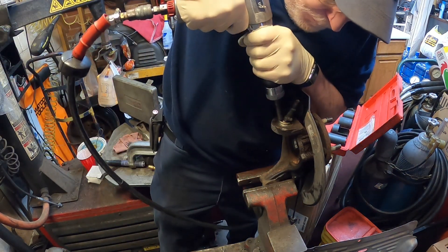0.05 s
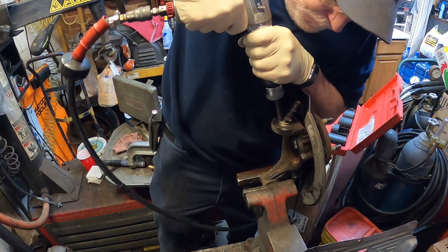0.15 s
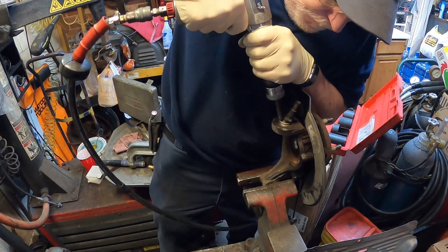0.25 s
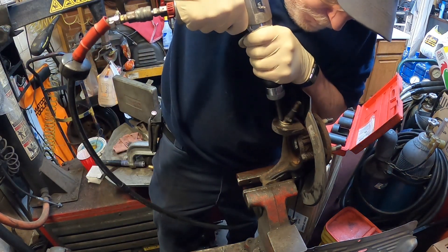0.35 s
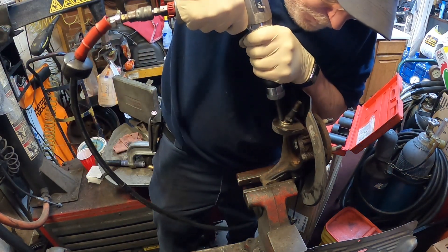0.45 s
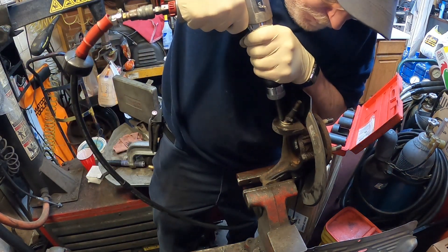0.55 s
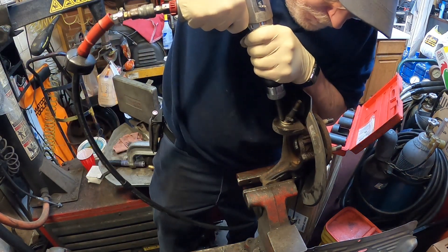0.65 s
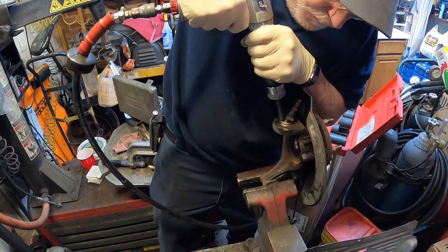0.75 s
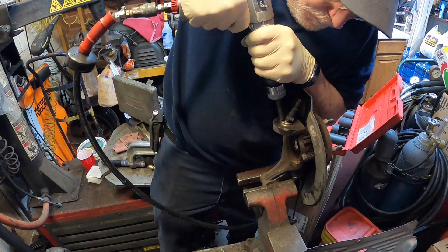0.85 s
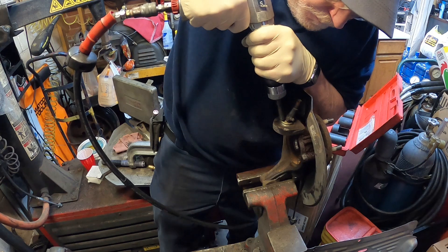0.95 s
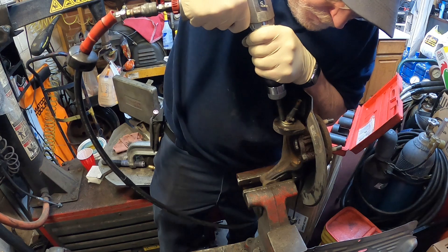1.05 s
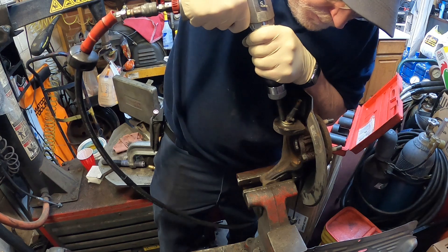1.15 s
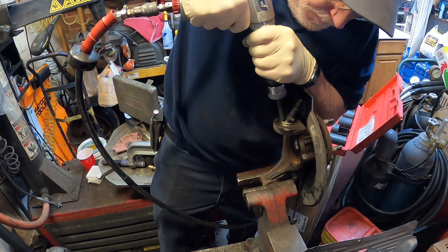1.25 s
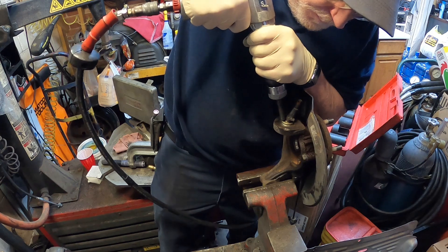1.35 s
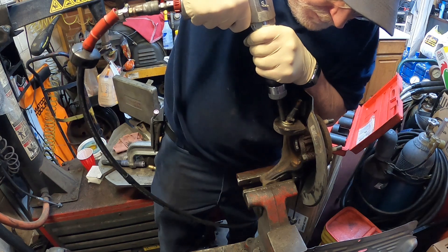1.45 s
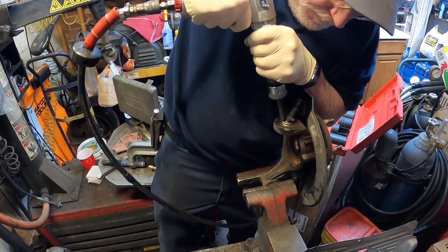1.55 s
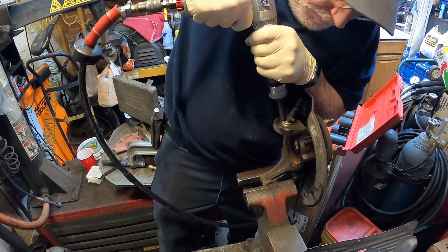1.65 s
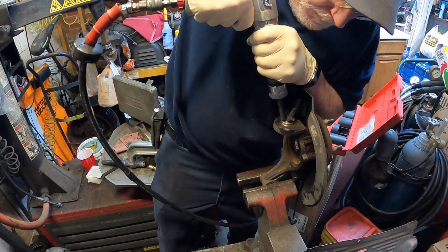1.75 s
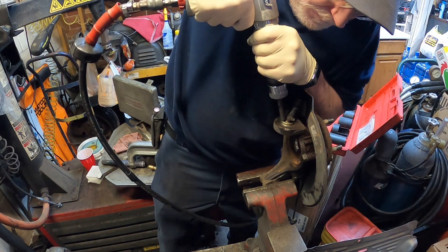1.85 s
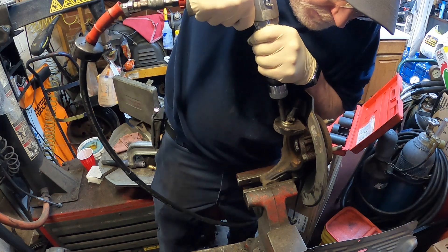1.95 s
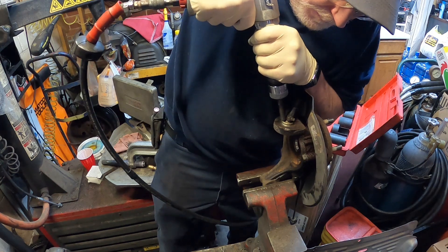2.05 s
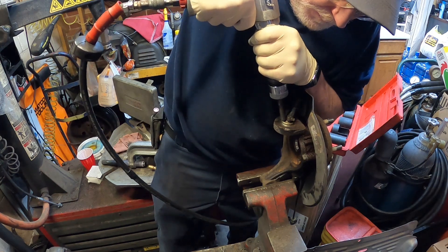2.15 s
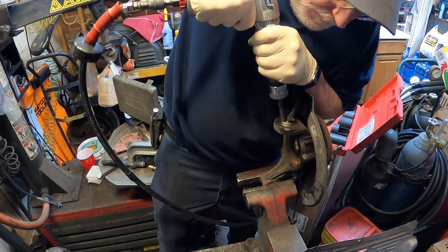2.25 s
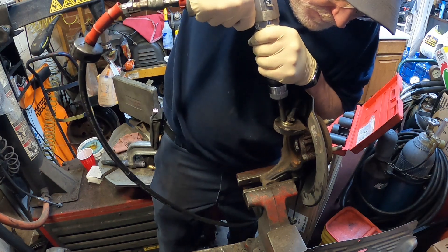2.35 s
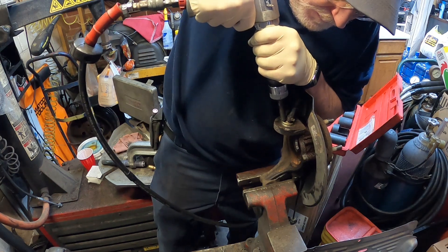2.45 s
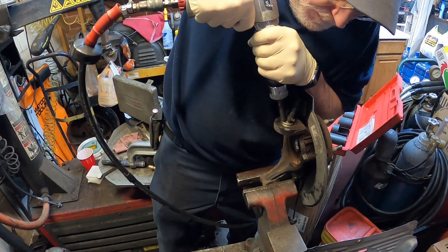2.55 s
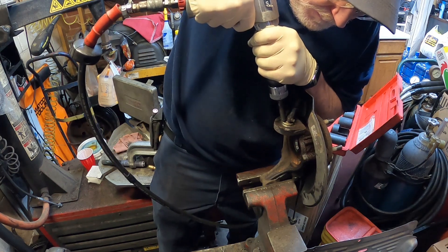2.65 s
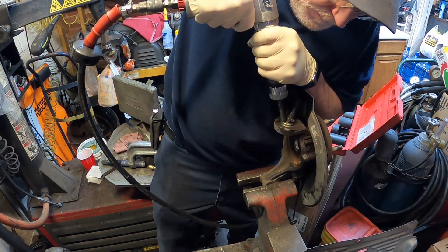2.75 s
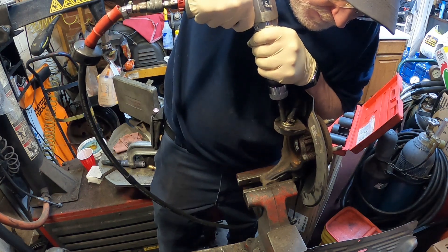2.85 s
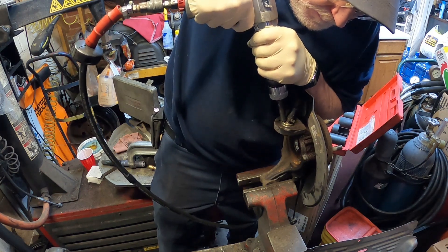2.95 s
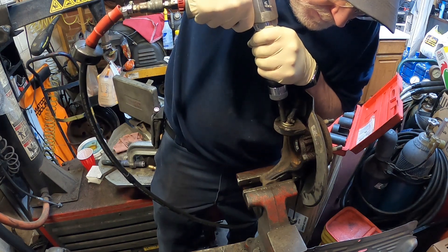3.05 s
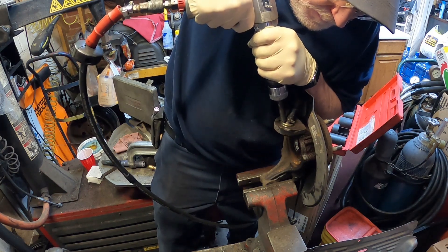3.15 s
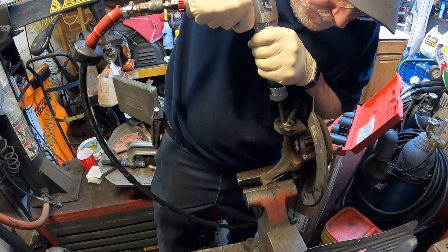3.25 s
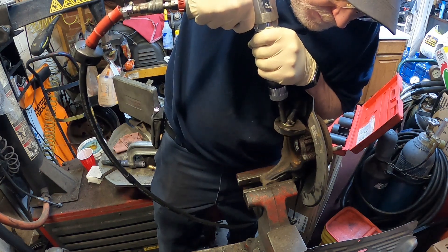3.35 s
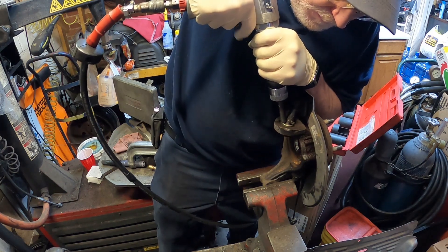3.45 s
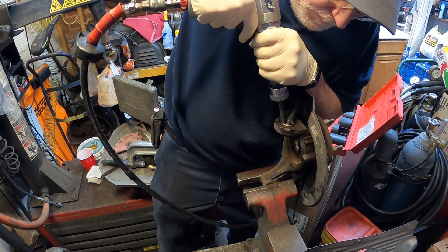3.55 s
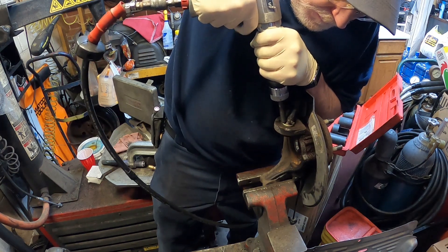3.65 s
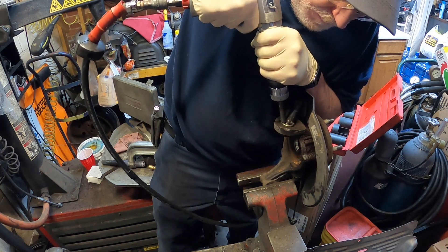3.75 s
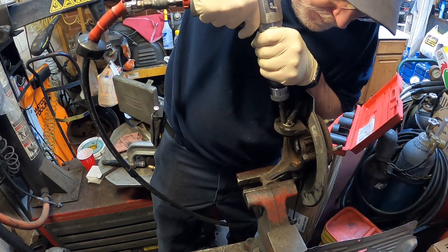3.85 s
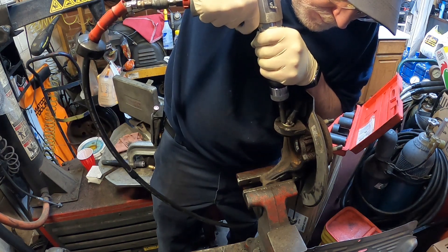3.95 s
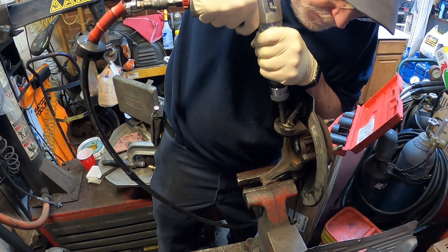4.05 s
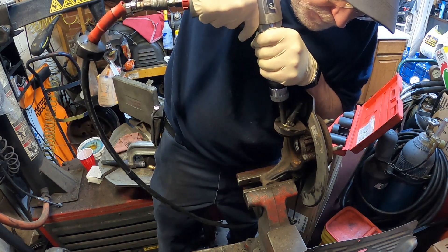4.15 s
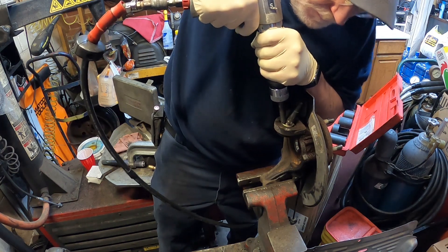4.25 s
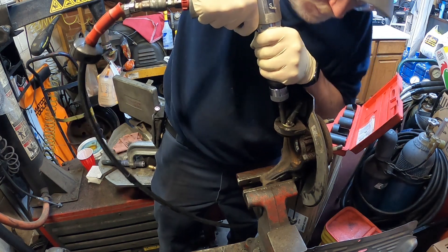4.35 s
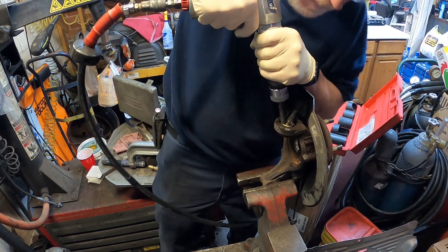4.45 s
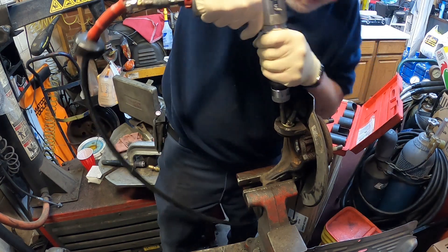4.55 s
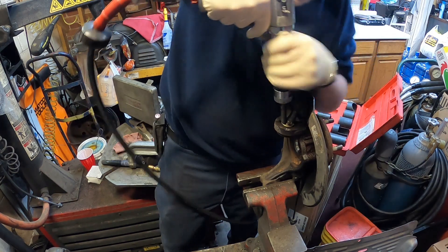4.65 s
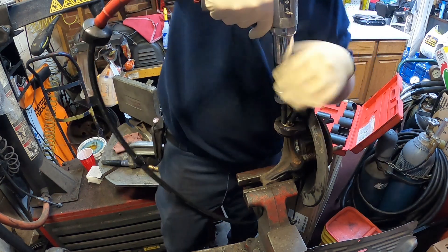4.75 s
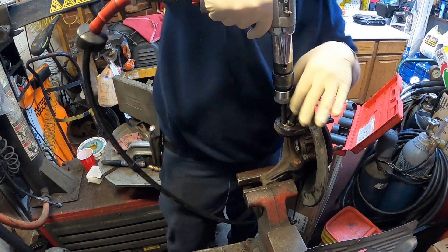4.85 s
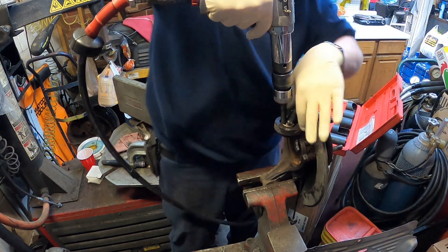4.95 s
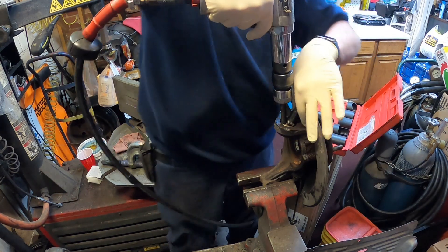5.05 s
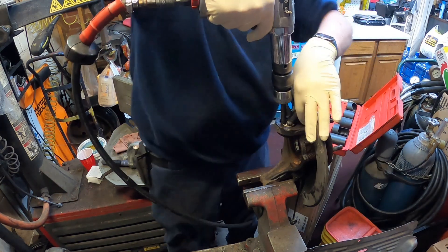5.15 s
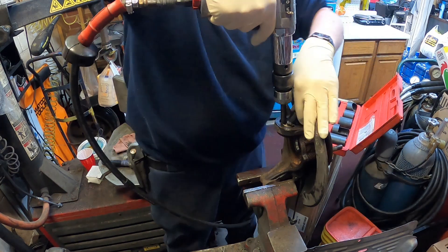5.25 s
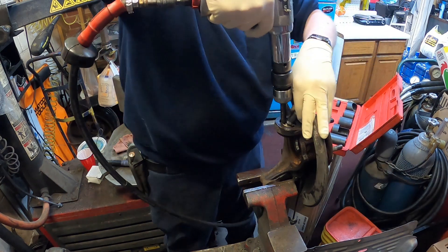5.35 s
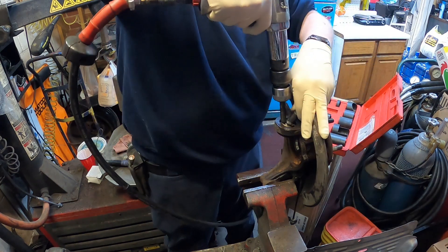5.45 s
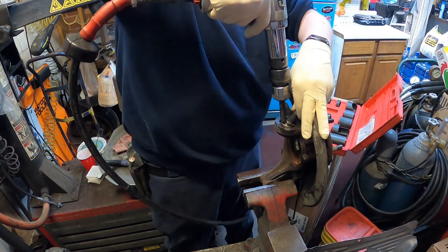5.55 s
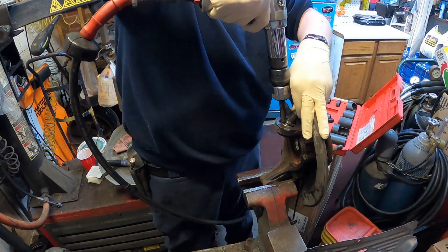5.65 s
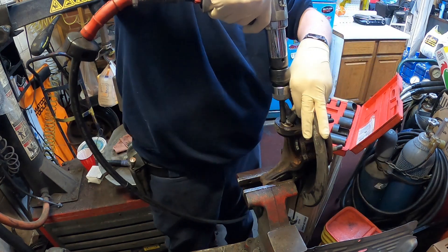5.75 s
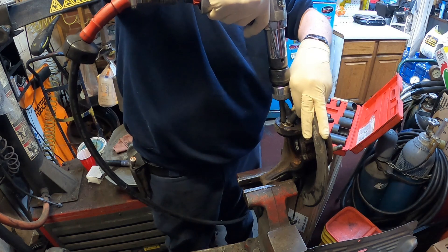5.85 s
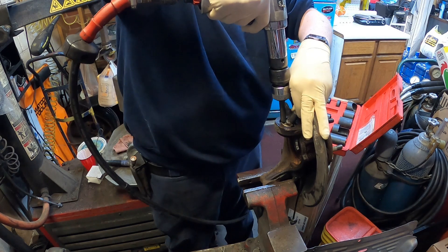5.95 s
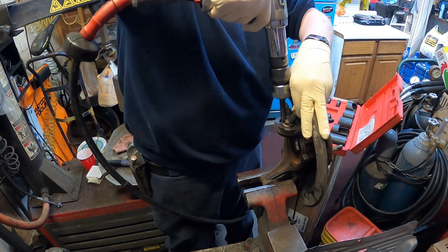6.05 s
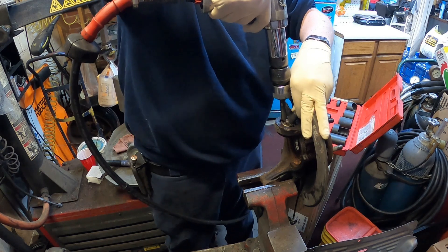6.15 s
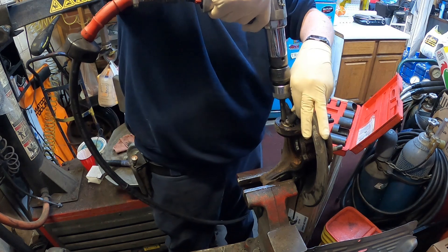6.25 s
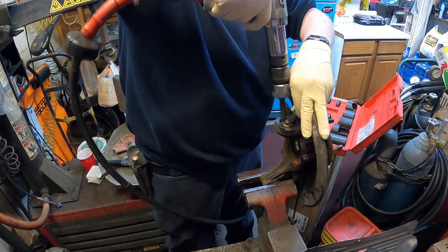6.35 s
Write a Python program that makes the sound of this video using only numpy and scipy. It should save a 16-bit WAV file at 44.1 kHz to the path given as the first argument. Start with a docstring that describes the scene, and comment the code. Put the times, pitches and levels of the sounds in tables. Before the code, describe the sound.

From the very start an air hammer close to the microphone drives a chisel against a steel part in a vise, in a small cluttered garage with short, dull reverberation. Until 3.5 seconds it is one dense metallic rattle, about forty blows a second, easing to thirty-seven; the clank changes colour as the chisel seats, over puffing, hissing exhaust and a low bench drone. Two weakening late blows follow. Short bursts of about four strokes come at 3.8, 4.1 and 4.4, led by soft air puffs and trailed by late clanks. The steel rings away from 4.6; a light tick at 4.8, a faint rub around 5, a fainter tick at 5.2 and a low rumble near 5.5 mark the tool being shifted. Another burst hits at 5.76 with one late blow, then a longer one from 6.05 until the end, with heavier bench thumps. Quiet room hush and a faint air leak lie underneath.

```python
"""Air hammer on clamped steel

An air hammer drives a chisel against a steel part held in a vise, in a small garage: one long burst, then five short ones.
Each piston stroke puffs air twice and strikes once, as clicks and noise bursts that excite resonances and filters.
The steel clanks and rings on, and as the air runs out the last blows come late.
In the pause the tool is shifted, with two ticks, a rub and a low rumble, all of shaped noise and ringing modes."""
import sys
import numpy as np
from scipy import signal
from scipy.fft import rfft, irfft
from scipy.io import wavfile
from scipy.ndimage import uniform_filter1d

SR = 44100
rng = np.random.default_rng(int(sys.argv[2]) if len(sys.argv) > 2 else 0)


def store_wav(level_fs):
    """Save 16-bit WAV to argv[1]."""
    pcm = np.round(np.clip(np.atleast_2d(level_fs), -1, 1) * 32767)
    wavfile.write(sys.argv[1], SR, pcm.T.astype(np.int16))


N = 281799
TIME = np.arange(N) / SR  # seconds

# Colour of the clank as the hammer starts. Each row: frequency in Hz, relative level in dB.
CLANK_FIRST = [(450, -16.5), (760, -17), (1110, -9), (1620, -16), (1840, -7), (2250, -6.5), (2460, 2.5),
               (2750, -6), (3040, -13.5), (3410, -12.5), (4730, -9), (8680, -43.5), (10900, -39),
               (12500, -36.5), (15500, -66)]
# Colour once the chisel has seated itself. Each row: frequency in Hz, relative level in dB.
CLANK_SEATED = [(450, -38), (760, -27), (907, -4), (1460, -17.5), (1600, -21), (2430, -3), (2790, -7),
                (3040, -3.5), (3330, -14), (5790, -11.5), (6330, -18.5), (8570, -16.5), (10900, -28.5),
                (12700, -28), (15500, -38)]
# Colour in the short bursts before the tool is shifted. Each row: frequency in Hz, relative level in dB.
CLANK_BURSTS = [(590, -25.5), (1000, -2), (1190, -19), (1440, -18.5), (1580, -17), (2450, -1.5),
                (2650, -6.5), (3040, -1), (3300, -17.5), (3910, -4), (4240, -11), (8060, -10.5),
                (11500, -26), (12800, -28.5), (15500, -36)]
# Colour after the tool is shifted. Each row: frequency in Hz, relative level in dB.
CLANK_SHIFTED = [(380, -58), (650, -27), (918, -3.5), (1330, -13.5), (1480, -7.5), (1580, -16.5),
                 (2060, 0.5), (2450, 2), (2720, -11), (2950, 2), (3410, -16), (3950, -6.5), (6200, -17),
                 (7880, -18.5), (15500, -50)]
# Damped resonances of chisel and tool. Each row: frequency in Hz, width in Hz, relative level in dB.
CHISEL_MODES = [(1430, 44, -8), (2483, 53, 6.5), (3140, 130, 0.5), (3490, 43, -6), (3870, 16, -2.5),
                (3950, 45, -9.5), (4790, 36, -13), (5215, 61, -13), (5534, 51, -10.5), (5870, 22, -8),
                (6080, 17, -13), (6600, 84, -35), (8026, 47, -15.5), (7770, 210, -23.5), (9350, 270, -20.5)]
# The part rings less under the pressed chisel, and under the hand laid on it after the pause
PRESSED_DB, HELD_DB = -3.5, -2.5


def steel(times, strike_db, crack_db, running):
    """A short dense clank and a bright crack, with the chisel's resonances and the long ring of the part."""
    blows = contacts(times, strike_db, running, chatter_db=-3.5, chatter_s=.008, return_db=-8.0)
    knocks = contacts(times + .001, strike_db, running, chatter_db=-16.0, chatter_s=.004, return_db=-2.5)
    cracks = spray(clicks(times - .0015, crack_db), 0.016)

    # share of each seat of the chisel over time
    seated = np.interp(TIME, [.15, .7], [0, 1])
    bursts, shifted = TIME > 3.7, TIME > 5
    seats = [
        (CLANK_FIRST, 1 - seated),
        (CLANK_SEATED, seated * ~bursts),
        (CLANK_BURSTS, bursts & ~shifted),
        (CLANK_SHIFTED, shifted),
    ]
    clank = np.zeros(N)
    for spectrum, share in seats:
        body = unit(cut(colour(dense_modes(t60=0.044), spectrum), 4990, "low"))
        edge = unit(cut(colour(dense_modes(t60=0.0067), spectrum), 5840, "high"))
        clank += from_db(16.0) * through(blows * share ** .5, body)
        clank += from_db(30.0) * through(cracks * share ** .5, edge)

    chisel = np.zeros(N)
    for k, (hz, width_hz, db) in enumerate(CHISEL_MODES):
        t60 = np.log(1000) / (np.pi * width_hz)  # a wide resonance dies sooner
        sign = (-1) ** k
        chisel += sign * from_db(db) * np.sqrt(width_hz / 80) * ring(knocks, hz, t60)
    chisel *= from_db(np.where(shifted, -16.0, -10.0))

    pressed_db = PRESSED_DB * (times < LAST_STROKE_S)
    held_db = HELD_DB * np.interp(times, TIME, shifted)
    long_ring = part_ring(clicks(times, strike_db + pressed_db + held_db))
    return clank + chisel + from_db(-27.5) * long_ring


def contacts(times, db, running, chatter_db, chatter_s, return_db, return_s=.0115):
    """The blow, the knock of the returning piston while air flows, and the chisel's chatter after both."""
    blow = clicks(times, db)
    return_knock = clicks(times + return_s, db + return_db + running)
    hits = blow + return_knock
    return hits + from_db(chatter_db) * spray(hits, chatter_s)


# Long-ringing modes of the steel part. Each row: frequency in Hz, relative level in dB, t60 in seconds.
PART_MODES = [(861, -15, 0.95), (2137, -10, 0.88), (2606, -10, 0.71), (2772, -4, 0.47), (2955, 0, 1.0),
              (3004, -8, 1.2), (3079, -2, 0.51), (3429, -6, 0.46), (3639, -15, 1.5), (3811, -10, 0.34),
              (4081, -4, 0.17), (4430, -20, 0.5), (4657, -11, 0.38), (4829, -22, 0.61), (5001, -16, 0.29),
              (5276, -15, 0.53), (5615, -13, 0.34), (5959, -25, 0.49), (6476, -23, 0.39), (6874, -23, 0.43)]


def part_ring(hits, kick=0.797):
    """Blows meet the long modes at chance phases: their energies add, and each blow nudges the phase."""
    out, struck = np.zeros(N), hits > 0
    for hz, db, t60 in PART_MODES:
        energy_decay = from_db(-120 / (t60 * SR))  # per sample
        energy = signal.lfilter([1], [1, -energy_decay], hits ** 2 + 1e-18)
        nudges = np.zeros(N)
        chance = rng.standard_normal(struck.sum())
        nudges[struck] = 2 * kick * chance * hits[struck] / np.sqrt(energy[struck])
        phase = 2 * np.pi * hz * TIME + np.cumsum(nudges)
        out += from_db(db) * np.sqrt(energy / t60) * np.sin(phase)
    return out


# Short runs of evenly spaced strokes. Each row: first stroke in seconds, last stroke in seconds,
# number of strokes, strike level in dB, kickback loss in dB, puff level in dB, crack level in dB.
RUNS = [(3.7765, 3.856, 4, -6.5, 6, -14.5, -32), (4.0647, 4.1457, 4, -7, 5, -14.5, -30.5),
        (4.4094, 4.5160, 4, -7.7, 0, -17.5, -33), (5.7646, 5.8397, 3, -4.5, 4, -16.5, -25.5),
        (6.0511, 6.1414, 4, -5, 4, -18, -25.5), (6.1735, 6.3726, 6, -7, 0, -20.3, -27.5)]
# The tool kicks back off the part over the first strokes of a run, then is pressed in again.
# Each row: stroke number from 0, share of the kickback loss from 0 to 1.
KICKBACK = [(0, 0), (1, .3), (2, 1), (3, .3), (4, 0)]
# Late blows as the air runs out after a burst. Each row: time in seconds, strike level in dB, crack level in dB.
LATE_BLOWS = [(3.5455, -10, -41), (3.6399, -18.5, -52), (3.8902, -10.5, -37.5), (3.951, -10, -44),
              (4.1963, -10, -39), (4.2903, -15, -51.5), (4.5821, -9.5, -39.5), (5.914, -8.5, -30)]


def strokes():
    """All piston strokes, long burst, runs and late blows, as columns (s, strike dB, puff dB, crack dB)."""
    rows = list(long_burst())
    for first_s, last_s, count, strike_db, kickback_db, puff_db, crack_db in RUNS:
        for k, s in enumerate(np.linspace(first_s, last_s, round(count))):
            loss_db = kickback_db * np.interp(k, *np.transpose(KICKBACK))
            rows.append((s, strike_db - loss_db, puff_db, crack_db))
    for s, strike_db, crack_db in LATE_BLOWS:
        wait_s = s - max(row[0] for row in rows if row[0] < s)
        rows.append((s, strike_db, puff_after(wait_s), crack_db))
    return np.transpose(rows)


# The long burst strikes evenly; its puffs swell while the chisel beds in
STRIKE_DB, CRACK_DB = -9.5, -31.5
BEDDING_S, BEDDING_DB = 1.3, -4.5
FIRST_STROKE_S, LAST_STROKE_S = .0176, 3.51


def long_burst():
    """Steady hammering, slightly uneven: rows (s, strike dB, puff dB, crack dB)."""
    turns = stroke_count()
    times = np.interp(np.arange(np.interp(LAST_STROKE_S, TIME, turns)), turns, TIME)
    puff_db = PUFF_DB + BEDDING_DB * np.maximum(0, 1 - times / BEDDING_S)
    rows = np.column_stack(np.broadcast_arrays(times, STRIKE_DB, puff_db, CRACK_DB))
    jitter_s, uneven_db = .00009, .45
    return rows + rng.standard_normal(rows.shape) * [jitter_s, uneven_db, uneven_db, uneven_db]


# The long burst slows as the air pressure sags. Each row: time in seconds, strokes per second.
STROKE_RATE = [(0.0, 40.1), (0.35, 39.44), (0.85, 39.61), (1.2, 38.87), (2.05, 37.69), (2.7, 37.39),
               (3.2, 36.62), (3.5, 36.77)]


def stroke_count():
    """Piston cycles of the long burst since its first stroke, at every sample."""
    turns = np.cumsum(np.interp(TIME, *np.transpose(STROKE_RATE))) / SR
    return turns - np.interp(FIRST_STROKE_S, TIME, turns)


# Longest wait at full pace, puff level up to there, and loss per doubling of the wait beyond it
FULL_PACE_S, PUFF_DB, PUFF_LOSS_DB = 0.028, -15, 12


def puff_after(wait_s):
    """Less air means a longer wait for the stroke and a weaker puff."""
    return PUFF_DB - PUFF_LOSS_DB * np.log2(np.maximum(wait_s / FULL_PACE_S, 1))


# Soft puffs with a rush of air before each short burst, two before the second.
# Each row: time in seconds, relative level of the air rush in dB, relative level of the puff in dB.
SOFT_PUFFS = [(3.756, 0, -22), (4.0297, -2.5, -16), (4.047, -6, -18), (4.3846, -10, -25),
              (5.7386, 0.5, -17), (6.028, -2.5, -24)]
# Low resonances stirred by each puff. Each row: frequency in Hz, relative level in dB, t60 in seconds.
THUD_MODES = [(61.4, -17, .06), (116.3, -1.5, 0.084), (151.3, -5.5, 0.094), (191.52, -10.5, 0.133),
              (247.8, -7, 0.034), (379.95, -2.5, 0.02985), (445, -16.5, 0.014), (503.3, -13, 0.089),
              (619, -34, 0.096)]
# Colour of the escaping air. Each row: frequency in Hz, relative level in dB.
AIR_COLOUR = [(290, -25.5), (500, 15.5), (1410, -12.5), (2970, -6), (3330, -8.5), (4500, -4.5), (5130, -21),
              (7130, -6.5), (15500, -38.5)]
# Colour of the bench shaking. Each row: frequency in Hz, relative level in dB.
SHAKE_COLOUR = [(20, -23.5), (30, 1), (42, 1), (70, 6), (110, 1.5), (200, -24.5), (400, -45.5)]


def exhaust(times, puff_db, lead_s=0.001716, second_s=0.00856, second_db=-11.0):
    """Air leaves in two puffs a stroke; it thuds and hisses, with a soft puff and a rush before each short burst."""
    soft_times, rush_db, soft_db = np.transpose(SOFT_PUFFS)
    puffs = clicks(times - lead_s, puff_db)
    puffs = puffs + clicks(times - lead_s + second_s, puff_db + second_db)
    puffs = puffs + clicks(soft_times, soft_db - 3.5)

    gusty = puffs + from_db(-15.0) * spray(puffs, .008)
    thud = sum(from_db(db) * ring(gusty, hz, t60) for hz, db, t60 in THUD_MODES)
    thud = cut(thud, 539, "low", order=3)

    vented = from_db(14.0) * spray(puffs, .025)
    rush = from_db(10.0) * spray(clicks(soft_times + .004, rush_db), .03, size=400)
    hiss = cut(colour(vented + rush, AIR_COLOUR), 900, "high", order=1)

    # the recoil shakes the bench, more so when the tool is held loosely
    shake = colour(spray(puffs, 0.031), SHAKE_COLOUR)
    shake = shake * from_db(np.interp(TIME, [3.5, 3.7, 5.0, 5.7], [-2.0, 5.0, 7.5, 10.5]))
    return from_db(4.0) * thud + from_db(8.5) * hiss + from_db(34.5) * shake


# The chisel touches the part lightly. Each row: time in seconds, relative level in dB.
TICKS = [(4.8079, -24.5), (5.1696, -37)]
# Colour of the ticks and the rub. Each row: frequency in Hz, relative level in dB.
RUB_COLOUR = [(880, -31), (1500, -12.5), (1690, 1.5), (3480, -3.5), (4390, -2), (5550, -12), (6210, -11.5),
              (14000, -27)]
# Colour of the rumble. Each row: frequency in Hz, relative level in dB.
RUMBLE_COLOUR = [(18, -37), (30, -16.5), (59, 4.5), (121, -13), (183, -16), (226, -50.5), (352, -24.5),
                 (468, -19.5), (517, -42), (563, -33), (900, -61), (1170, -91), (1980, -120)]
# The loose chisel rings briefly at each tick
TICK_HZ, TICK_T60_S, TICK_RING_DB = 896, 0.27, -17
RUB_START_S, RUB_DB = 4.96, -54.5
# The rumble lasts until just before the next burst
RUMBLE_START_S, RUMBLE_HOLD_S, RUMBLE_DB = 5.41, .19, -29.0


def handling():
    """Ticks of the chisel, a brief rub and a low rumble, from clicks and coloured noise, as the tool is shifted."""
    touches = clicks(*np.transpose(TICKS))
    ticks = from_db(13.5) * colour(spray(touches, 0.0057), RUB_COLOUR)
    ticks += from_db(-34.0) * part_ring(touches)
    ticks += from_db(TICK_RING_DB) * ring(touches, TICK_HZ, TICK_T60_S)
    rub = swell(RUB_START_S, attack_s=0.069, hold_s=0.018, release_s=0.068, db=RUB_DB)
    rub = rub * noise(RUB_COLOUR)
    rumble = swell(RUMBLE_START_S, attack_s=.11, hold_s=RUMBLE_HOLD_S, release_s=.15, db=RUMBLE_DB)
    rumble = rumble * noise(RUMBLE_COLOUR)
    return ticks + rub + rumble


# The bench sways once a stroke until it settles, and has a resonance near three times the stroke rate
SWAY_DB, SWAY_SETTLES_S, SWAY_FADE_S = -24, 1.42, .16
BENCH_HZ, BENCH_WIDTH_HZ, DRONE_DB = 111.8, 4.5, -21.5


def bench(lead_s=0.0027):
    """The bench and vise swing in step with the strokes; they drone as the slowing hammer nears their resonance."""
    rate = np.interp(TIME, *np.transpose(STROKE_RATE))
    phase = 2 * np.pi * (stroke_count() + lead_s * rate)
    settling = np.exp(-np.maximum(0, TIME - SWAY_SETTLES_S) / SWAY_FADE_S)
    sway = from_db(SWAY_DB) * settling * np.sin(phase)
    detuning = 2 * (3 * rate - BENCH_HZ) / BENCH_WIDTH_HZ
    drone = from_db(DRONE_DB) * np.cos(3 * phase) / np.hypot(1, detuning)
    stopping = np.exp(-np.maximum(0, TIME - LAST_STROKE_S) / .012)
    return (sway + drone) * stopping


def garage(x, t60=0.333, wet_db=-4.0, dull_hz=6500, size=300):
    """A short, dull reverberation from cluttered walls, a few milliseconds behind the direct sound."""
    tail = np.pad(dense_modes(t60), (size, 0))  # size: delay in samples
    spectrum = [(120, -14), (300, -7), (1000, wet_db), (5000, wet_db)]  # Hz, dB
    echo = colour(through(x, tail), spectrum)
    return x + cut(echo, dull_hz, "low", order=2)


# Colour of the room's hush. Each row: frequency in Hz, relative level in dB.
HUSH_COLOUR = [(15, -37), (25, -4), (142, 2.5), (293, -16), (523, -8), (699, -17.5), (1340, -21.5),
               (1440, -20.5), (2020, -24.5), (2900, -26), (3200, -31.5), (4480, -34.5), (8000, -42),
               (10400, -65), (17600, -120)]
HUSH_DB = -47.5


def background(leak_hz=4450, leak_db=-74.0):
    """The low hush of the room and a faint whistle of leaking air, which is noise through a resonance."""
    leak = unit(ring(rng.standard_normal(N), leak_hz, t60=.015)) * np.sqrt(N)
    return from_db(HUSH_DB) * noise(HUSH_COLOUR) + from_db(leak_db) * leak


def from_db(db):
    """Decibels to gain."""
    return 10 ** (np.asarray(db) / 20)


def unit(x):
    """Scale to an energy of one."""
    return x / np.sqrt(np.sum(x ** 2) + 1e-20)


def gain_at(points, hz):
    """Read a spectrum on a log-frequency axis."""
    f, db = np.transpose(points)
    return from_db(np.interp(np.log(hz + 1), np.log(f), db))


def colour(x, points, size=4096):
    """Causal (minimum-phase) filter with the given spectrum."""
    cepstrum = irfft(np.log(gain_at(points, np.fft.rfftfreq(size, 1 / SR))))
    # folding the cepstrum forward in time makes the filter causal
    cepstrum[1:size // 2] *= 2
    cepstrum[size // 2 + 1:] = 0
    return through(x, irfft(np.exp(rfft(cepstrum))))


def through(x, response):
    """Convolve, keeping the length."""
    return signal.fftconvolve(x, response)[:len(x)]


def cut(x, hz, kind, order=4):
    """Butterworth low- or high-pass."""
    sos = signal.butter(order, min(hz, SR / 2 - 1), kind, fs=SR, output="sos")
    return signal.sosfilt(sos, x)


def noise(points):
    """Coloured noise of rms one."""
    return unit(colour(rng.standard_normal(N), points)) * np.sqrt(N)


def clicks(times, db):
    """One impulse for each time."""
    samples = np.clip(np.round(times * SR).astype(int), 0, N)
    return np.bincount(samples, from_db(db), N + 1)[:N]


def ring(x, hz, t60):
    """A unit click starts a decaying oscillation of height one."""
    r = from_db(-60 / (t60 * SR))  # decay per sample
    w = 2 * np.pi * hz / SR
    return signal.lfilter([.5, 0, -.5], [1, -2 * r * np.cos(w), r * r], x + 1e-18)


def spray(hits, decay_s, size=110):
    """Each click becomes a quickly swelling, then dying burst of noise of the same energy."""
    r = np.exp(-2 / (decay_s * SR))
    energy = signal.lfilter([1 - r], [1, -r], hits ** 2 + 1e-18)
    energy = uniform_filter1d(energy, size)  # size: swell in samples
    return np.sqrt(np.abs(energy)) * rng.standard_normal(N)


def dense_modes(t60, size=16384):
    """Response of countless overlapping modes, even over the spectrum; energy one."""
    fade = from_db(-60 * TIME[:size] / t60)
    response = rng.standard_normal(size) * fade
    for _ in range(4):  # flatten the spectrum and restore the fade in turn
        spectrum = rfft(response)
        response = irfft(spectrum / np.sqrt(uniform_filter1d(np.abs(spectrum) ** 2, size=9)))
        response *= fade / np.sqrt(np.abs(uniform_filter1d(response ** 2, size=200)) + 1e-20)
    return unit(response)


def swell(start_s, attack_s, hold_s, release_s, db):
    """Gain that rises 30 dB in the attack, holds, and falls 30 dB in the release, on the same slopes outside."""
    before = 1 - (TIME - start_s) / attack_s
    after = (TIME - start_s - attack_s - hold_s) / release_s
    return from_db(db - 30 * np.clip(np.maximum(before, after), 0, 5))


# Colour of the side signal once the image has narrowed. Each row: frequency in Hz, relative level in dB.
NARROW_WIDTH = [(60, -41.5), (110, -53.5), (200, -46), (380, -38), (700, -28.5), (1290, -37.5),
                (2380, -54.5), (4400, -31), (8120, -16.5), (15000, 3.5)]
# Colour of the side signal while the image is wide. Each row: frequency in Hz, relative level in dB.
OPEN_WIDTH = [(60, -3), (110, -13), (200, -11), (380, -11), (700, -9.5), (1290, -7), (2380, -5), (4400, 0),
              (8120, 5.5), (15000, 5)]
NARROWING_S, NARROWING_DB_PER_S = 0.218, 36  # when the wide image starts to fade, and how fast


def scene():
    """The hammer close in front; the image starts wide, then narrows to the centre except in the treble."""
    times, strike_db, puff_db, crack_db = strokes()
    running = np.minimum(0, puff_db - PUFF_DB)  # dB: the return stroke weakens with the air pressure
    hammer = steel(times, strike_db, crack_db, running) + exhaust(times, puff_db)
    mid = garage(hammer + handling())
    # a briefly blurred copy of the sound, added left and subtracted right, makes the width
    blurred = through(mid, dense_modes(t60=0.049))
    wide = from_db(-NARROWING_DB_PER_S * np.maximum(0, TIME - NARROWING_S))
    side = (1 - wide) * colour(blurred, NARROW_WIDTH) + wide * colour(blurred, OPEN_WIDTH)
    return np.array([mid + side, mid - side]) + bench() + background()


CUTOFF_HZ = 15750


def record(dry, port_hz=12500, port_t60=.009, left_db=-27.0, right_db=-17.0):
    """The microphone ports ring, mostly the right one; peaks are rounded and the top is cut."""
    heard = dry + from_db([[left_db], [right_db]]) * ring(dry, port_hz, port_t60)
    rounded = .95 * np.tanh(heard / .95)
    top_cut = signal.ellip(10, .1, 80, CUTOFF_HZ, fs=SR, output="sos")
    return signal.sosfilt(top_cut, rounded)


dry = scene()
out = record(dry)
store_wav(out)
```